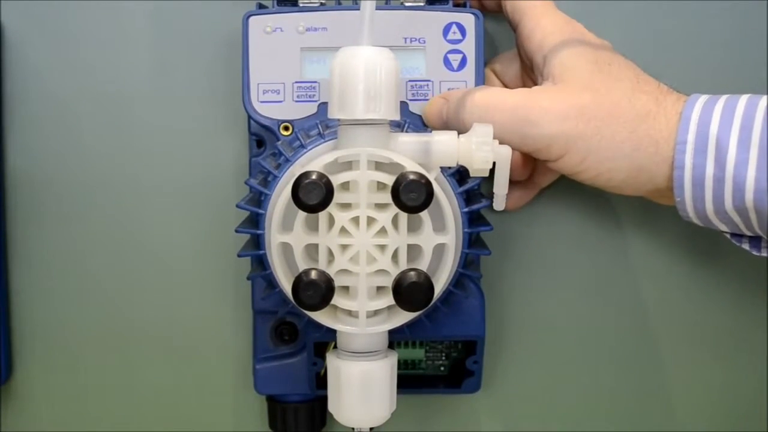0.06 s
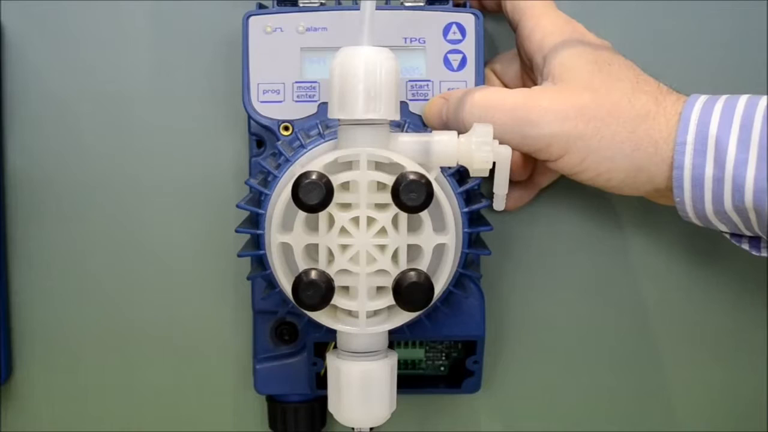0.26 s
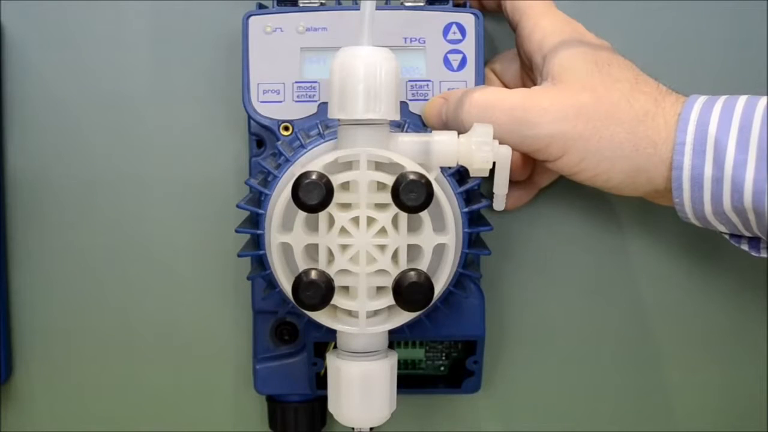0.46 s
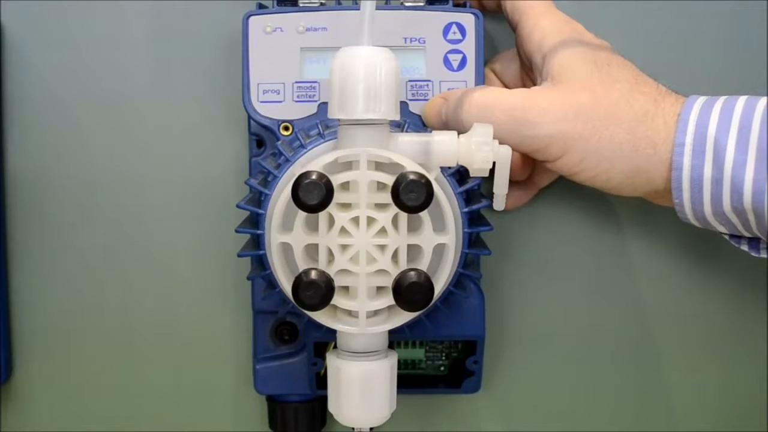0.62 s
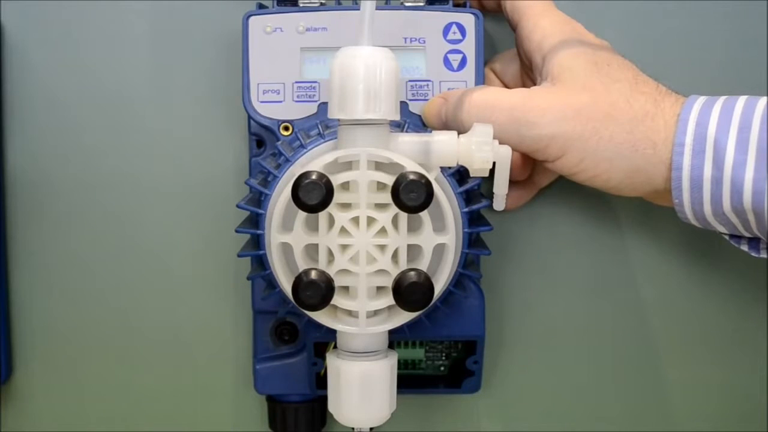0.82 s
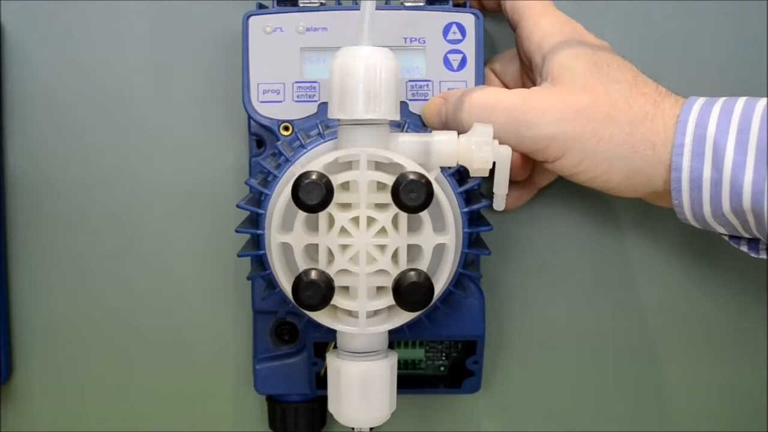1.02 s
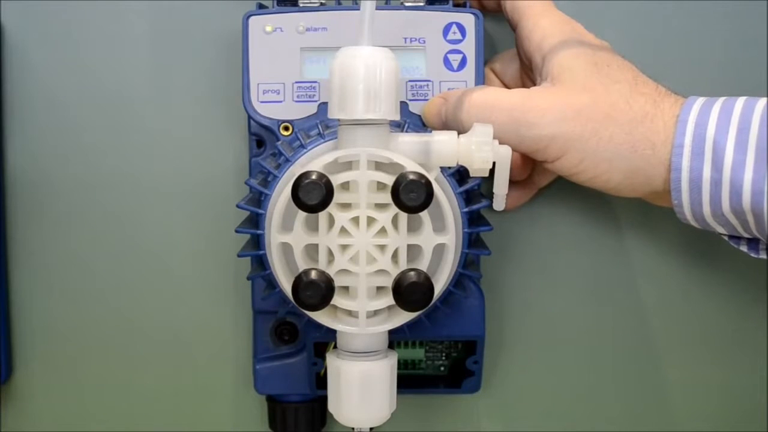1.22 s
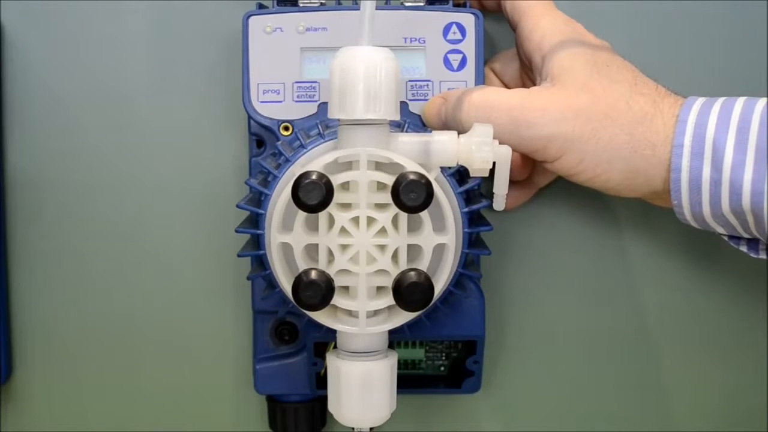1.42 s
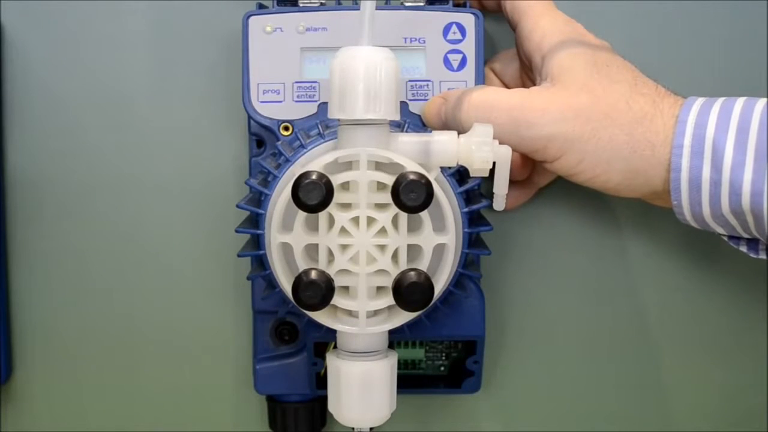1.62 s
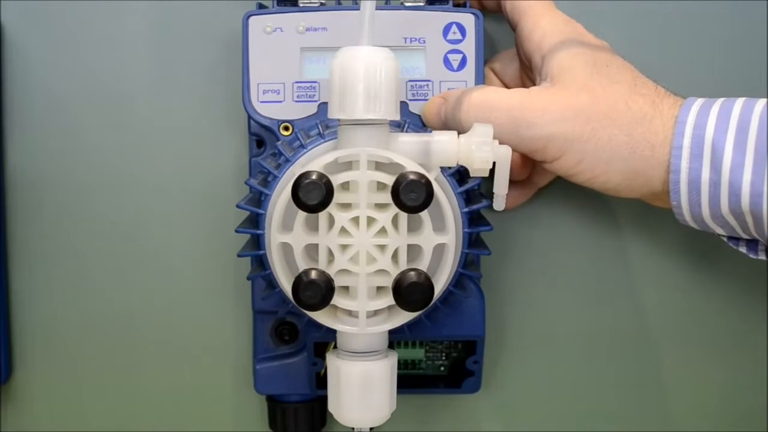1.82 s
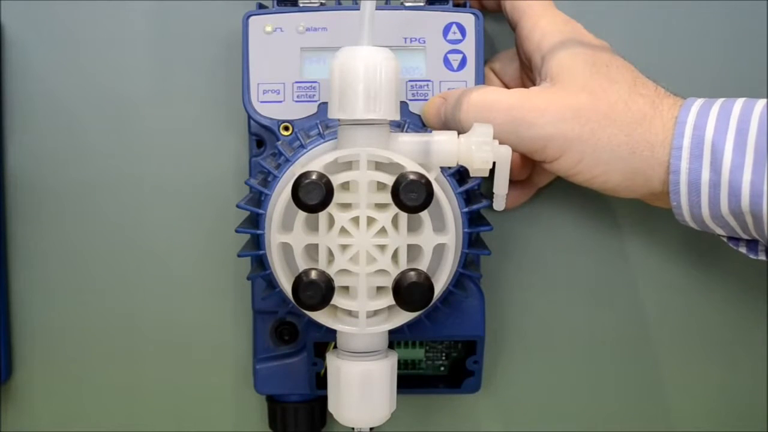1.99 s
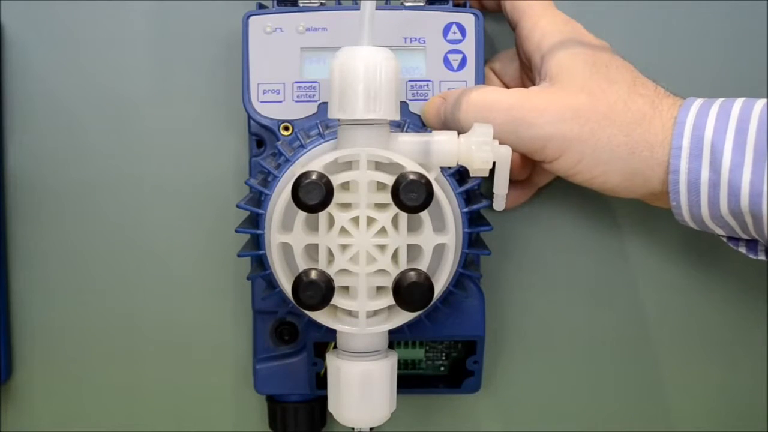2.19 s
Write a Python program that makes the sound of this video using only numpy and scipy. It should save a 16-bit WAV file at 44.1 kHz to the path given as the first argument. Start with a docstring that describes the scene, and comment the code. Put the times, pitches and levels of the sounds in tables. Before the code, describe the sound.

Sharp, even knocks come from a dosing pump running close by in a small, bare room. After each thumping clack the valves chatter and hiss softly and the room rings briefly, with faint ventilation and a low hum underneath.

```python
"""Solenoid dosing pump in a small, bare room

The pump knocks close by, about 160 times a minute. In each stroke the coil buzzes for an instant,
the diaphragm thumps and the plunger clacks on its stop; then the ball valves chatter and hiss.
The room rings after each knock, over a faint hum and ventilation noise."""
import sys
import numpy as np
from scipy import signal
from scipy.fft import rfft, irfft, next_fast_len
from scipy.io import wavfile
from scipy.ndimage import uniform_filter1d

SR = 44100
rng = np.random.default_rng(int(sys.argv[2]) if len(sys.argv) > 2 else 0)


def unload_wav(signal):
    """Save mono or channel-first audio to the path in sys.argv[1] as 16-bit WAV at rate SR, clipped to [-1, 1]."""
    wavfile.write(
        sys.argv[1],
        SR,
        np.round(np.clip(np.atleast_2d(signal).T, -1, 1) * 32767).astype(np.int16),
    )


N = 103635

# plunger scrape and crack spectrum: f/Hz, relative level/dB
CRACK_SPECTRUM = [(60, -42), (130, -34), (300, 5), (750, 11), (1300, 4.5), (2200, 3), (3200, -5.5),
                  (5500, -11), (7500, -22), (10000, -21), (11000, -59)]
# valve housing modes: f/Hz, relative level/dB, t60/s
VALVE_MODES = [(2543, -3, 0.15), (3030, -5, .28), (3390, -12, 0.26), (3800, -2, 0.13), (4310, -3.5, 0.16),
               (5450, 1.5, 0.072), (6900, -12.5, 0.031), (8560, -19.5, 0.06), (9650, -11, 0.057)]
LEAD_S = 0.007  # coil and plunger start ahead of the knock
CRACK_T60_S, TICK_ATTACK_S = 0.083, 0.0026


def undb(db):
    return 10 ** (np.asarray(db) / 20)


def clock(size):
    return np.arange(size) / SR


def fade(t, t60_s):
    """Silent before t = 0, then falls 60 dB per t60_s."""
    return (t >= 0) * np.exp(-np.log(1000) * np.maximum(t, 0) / t60_s)


def rise(t, length_s):
    """Smooth step from 0 to 1."""
    return np.sin(np.pi / 2 * np.clip(t / length_s, 0, 1)) ** 2


def burst(t, attack_s, t60_s):
    """Attack-decay envelope from t = 0."""
    return rise(t, attack_s) * fade(np.maximum(t - attack_s, 0), t60_s)


def lookup(table, hz):
    """Interpolate on a log-frequency axis."""
    table_hz, values = np.array(table).T
    return np.interp(np.log(np.maximum(hz, 1)), np.log(table_hz), values)


def noise(spectrum, size):
    """Coloured noise, rms 1."""
    n = next_fast_len(size)
    gain = undb(lookup(spectrum, np.fft.rfftfreq(n, 1 / SR)))
    y = irfft(rfft(rng.standard_normal(n)) * gain, n)[:size]
    return y / y.std()


def flutter(size, smooth_s):
    """Smoothed random wander, standard deviation 1."""
    y = uniform_filter1d(rng.standard_normal(size), max(int(smooth_s * SR), 1))
    return y / y.std()


def ring(modes, t, attack_s):
    """Modes driven for attack_s, then ringing out; neighbours alternate in sign."""
    return sum((-1) ** k * undb(db) * np.sin(2 * np.pi * hz * t) * burst(t, attack_s, t60_s)
               for k, (hz, db, t60_s) in enumerate(modes))


def add(out, sound, start_s):
    """Mix sound into out at start_s."""
    start = int(start_s * SR)
    part = sound[max(-start, 0):N - start]
    first = max(start, 0)
    out[first:first + len(part)] += part


def ventilation_and_hum(air_db=-58.5, hum_hz=136, hum_db=-75):
    """Faint ventilation noise and a low hum."""
    # ventilation spectrum: f/Hz, relative level/dB
    air_spectrum = [(25, -20), (102, -23), (136, 18.5), (200, -5), (350, 3.5), (700, -2.5), (1400, -5.5),
                    (2550, -10), (2720, 1), (2950, -13.5), (3650, -8), (5000, -19.5), (11000, -35)]
    hum = np.sin(2 * np.pi * hum_hz * clock(N))
    return undb(air_db) * noise(air_spectrum, N) + undb(hum_db) * hum


def flow(t, hiss_db=-47.5, sing_db=-55, end_s=0.11, rough_db=0.5):
    """Uneven hiss through the valves swells, rings their housing and dies as the diaphragm stops."""
    # flow spectrum: f/Hz, relative level/dB
    flow_spectrum = [(400, -12.5), (1300, 14), (2500, -4), (4200, 10.5), (4900, -20), (5500, 11),
                     (6300, -20), (11000, -38)]
    n = len(t)
    gate = fade(np.maximum(t - end_s, 0), t60_s=0.22) * undb(rough_db * flutter(n, smooth_s=0.012))
    housing = ring(VALVE_MODES, clock(n), TICK_ATTACK_S)
    drive = rng.standard_normal(n) * gate * rise(t, length_s=0.16)
    sing = signal.fftconvolve(drive, housing / np.linalg.norm(housing))[:n]
    hiss = noise(flow_spectrum, n) * gate * rise(t, length_s=0.017)
    return undb(hiss_db) * hiss + undb(sing_db) * sing


def ball_valves(click_db=-37.3, body_db=-40, housing_db=-46, echo_db=-14.5):
    """Balls tick on their seats over a dull knock and ring the housing; each tick has a short echo."""
    # ball impacts: t/s, level/dB, dull knock offset/dB
    ticks = [(0.1398, 2.5, 3), (0.166, 3, -7), (0.186, -3.5, -17), (.203, -6, -6), (.222, -3, -18),
             (0.533, -4, -13), (.566, 0, -18), (0.5845, -4.5, -9), (0.6029, -5.5, -5), (.626, -5.5, -5),
             (.881, 0.5, 2), (.922, -2.5, 10), (.981, -9.5, -15), (1.271, 4.5, -20), (1.299, -1, -2),
             (1.370, -2.5, -30), (1.651, 2.5, -1), (1.678, 1.5, 1), (1.695, -9.5, 10), (1.712, -5, -3),
             (1.75, -0.5, -19), (1.804, -16, -12), (2.011, 3.5, 2.5), (2.034, 3.5, 0), (2.057, -2.5, -2),
             (2.0749, -0.5, -7), (2.0975, -1, -1.5), (2.112, -3.5, -9), (2.161, -12, -8)]
    # bright click spectrum: f/Hz, relative level/dB
    click_spectrum = [(1500, 6), (2400, 3), (3500, 6), (4800, -3.5), (5500, 5), (6600, -8), (7050, -2.5),
                      (7700, -17.5), (8500, -3.5), (9200, -15.5), (10300, -9.5), (11300, -32)]
    # dull knock spectrum: f/Hz, relative level/dB
    body_spectrum = [(300, -15), (1400, 8.5), (2200, -13), (3500, -24)]
    out, t = np.zeros(N), clock(SR // 5)
    echo = undb(echo_db) * burst(t, TICK_ATTACK_S, t60_s=0.35)
    envelope = burst(t, TICK_ATTACK_S, t60_s=0.041) + echo
    for start_s, tick_db, offset_db in ticks:
        jitter = rng.standard_normal((len(VALVE_MODES), 2))
        modes = [(hz * (1 + 0.003 * pitch), db + 2 * level, t60_s)
                 for (hz, db, t60_s), (pitch, level) in zip(VALVE_MODES, jitter)]
        click = undb(click_db) * noise(click_spectrum, len(t))
        body = undb(body_db + offset_db) * noise(body_spectrum, len(t))
        housing = undb(housing_db) * ring(modes, t, TICK_ATTACK_S)
        add(out, undb(tick_db) * (envelope * (click + body) + housing), start_s)
    return out


def coil(t, switch_hz=2027, jitter_rad=0.089, peak_s=0.012, rise_db_per_s=1100):
    """The chopped coil current buzzes as it builds, then dies away."""
    # buzz partials: multiple of the switching rate, level/dB
    harmonics = [(1, -28), (2, -33), (4, -39.5), (5, -53)]
    swell = rise(t + LEAD_S, length_s=0.00041) * undb(rise_db_per_s * np.minimum(t - peak_s, 0))
    decay = fade(np.maximum(t - peak_s, 0), t60_s=0.019)
    phase = 2 * np.pi * switch_hz * t + jitter_rad * flutter(len(t), smooth_s=0.002)
    return swell * decay * sum(undb(db) * np.sin(k * phase) for k, db in harmonics)


def plunger_scrape(t, gain_db=-30.5, attack_s=0.015):
    """The plunger scrapes briefly as it gathers speed."""
    return undb(gain_db) * noise(CRACK_SPECTRUM, len(t)) * burst(t + LEAD_S, attack_s, CRACK_T60_S)


def crack_and_reverb(t, crack_db=-30.5, crack_delay_s=0.0015, reverb_db=-27.5, reverb_delay_s=0.0076):
    """The crack of the blow and its diffuse reverberation, each octave dying at its own rate."""
    # reverberation spectrum: f/Hz, relative level/dB
    reverb_spectrum = [(30, -48), (60, -1), (100, -4), (125, 4.5), (165, -3), (310, 3), (400, 4), (520, -2),
                       (750, -1.5), (1000, -3), (1600, -3), (1850, -1), (2060, 5.5), (2300, -5.5),
                       (3200, -14.5), (4300, -13.5), (7000, -25.5), (11000, -36)]
    # room decay times: f/Hz, t60/s
    reverb_t60 = [(70, 0.78), (200, 0.55), (500, 0.65), (1000, 0.57), (2000, 0.33), (4000, 0.55),
                  (10000, 0.29)]
    n = len(t)
    spectrum, hz = rfft(noise(reverb_spectrum, n)), np.fft.rfftfreq(n, 1 / SR)
    octave = np.log2(np.clip(hz, 80, 10240) / 80)
    tail = np.zeros(n)
    for k in range(8):
        band = irfft(spectrum * np.maximum(1 - abs(octave - k), 0), n)
        tail += band * fade(t, lookup(reverb_t60, 80 * 2 ** k))
    tail *= rise(t - reverb_delay_s, length_s=0.015)
    crack = noise(CRACK_SPECTRUM, n) * fade(t - crack_delay_s, CRACK_T60_S)
    return undb(crack_db) * crack + undb(reverb_db) * tail


def knock(t):
    """The diaphragm thumps the head, the plunger hits its stop with a snap, the room modes take it up."""
    # pump head and housing modes: f/Hz, level/dB, t60/s
    head_modes = [(151.6, -23, 0.1), (257, -39, 0.046), (374.8, -22.5, 0.11), (541, -23, 0.039),
                  (727, -17.5, 0.032), (856, -27.5, 0.068), (972, -26.5, 0.049), (1146, -41.5, 0.11)]
    # plunger and stop modes: f/Hz, level/dB, t60/s
    stop_modes = [(1585, -23, 0.038), (1900, -27, 0.016), (2077.6, -17, 0.026), (2345, -33, 0.0087),
                  (2714, -37, 0.0088), (4260, -34, 0.015), (5400, -42, 0.035), (6170, -45, 0.018)]
    # standing waves of the room: f/Hz, level/dB, t60/s
    room_modes = [(144.6, -26, 0.14), (173, -35, .22), (219.9, -37, 0.19), (267.5, -35, 0.26),
                  (341.6, -37, 0.58), (384.3, -36.5, 0.53), (547, -46, .6), (685, -52, 0.95),
                  (782, -55, 0.27), (841.5, -35.5, 0.15), (1098, -44.5, 0.49)]
    head_lead_s, stop_delay_s, room_delay_s, snap_delay_s = 0.00092, 0.00023, 0.005506, 0.0085
    snap_hz, snap_db, snap_t60_s = 2500, -18, 0.0017
    low_cut = signal.butter(3, 104.5, "high", fs=SR, output="sos")  # small body, little bass
    thump = signal.sosfilt(low_cut, ring(head_modes, t + head_lead_s, attack_s=0.00056))
    clack = ring(stop_modes, t - stop_delay_s, attack_s=0.0068)
    snap = ring([(snap_hz, snap_db, snap_t60_s)], t - snap_delay_s, attack_s=0.0001)
    room = ring(room_modes, t - room_delay_s, attack_s=0.037)
    return thump + clack + snap + room


def pump(stroke_length_s=0.6):
    """Nearly identical strokes: buzz, scrape, knock, reverberation and flow."""
    # strokes: t/s, level/dB
    strokes = [(-.262, 0), (0.111, 0), (0.4908, 0.1), (0.8508, -0.5), (1.2416, -0.46), (1.6213, -0.44),
               (1.9815, -0.6)]
    fresh_share = 0.28  # of crack and reverb power, new in each stroke
    out, t = np.zeros(N), clock(int(stroke_length_s * SR)) - LEAD_S
    common = plunger_scrape(t) + knock(t) + np.sqrt(1 - fresh_share) * crack_and_reverb(t)
    for knock_s, db in strokes:
        stroke = common + coil(t) + np.sqrt(fresh_share) * crack_and_reverb(t) + flow(t)
        add(out, undb(db) * stroke, knock_s - LEAD_S)
    return out


def scene():
    """Pump, valves and background in mono."""
    return (pump() + ball_valves() + ventilation_and_hum())[None]


def record(dry):
    """Steep low-pass on the top treble."""
    cutoff_hz = 11150
    return signal.sosfilt(signal.ellip(10, 0.2, 70, cutoff_hz, fs=SR, output="sos"), dry)


dry = scene()
out = record(dry)
unload_wav(out)
```